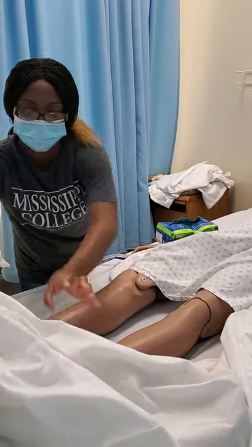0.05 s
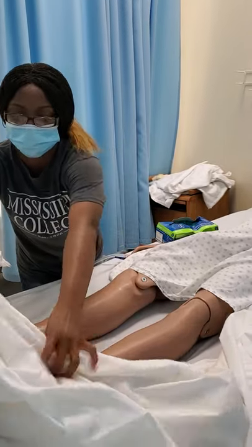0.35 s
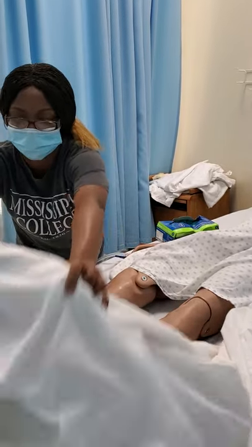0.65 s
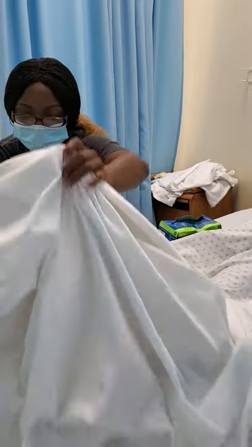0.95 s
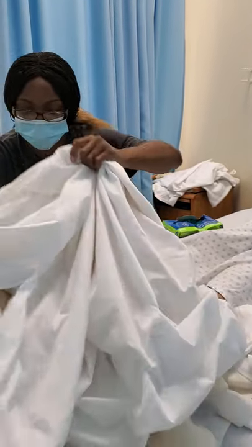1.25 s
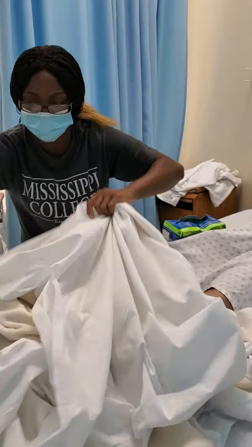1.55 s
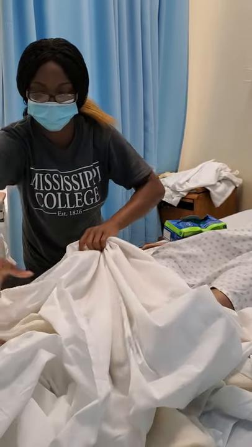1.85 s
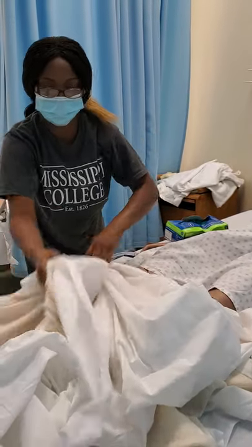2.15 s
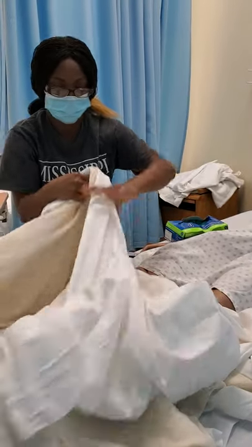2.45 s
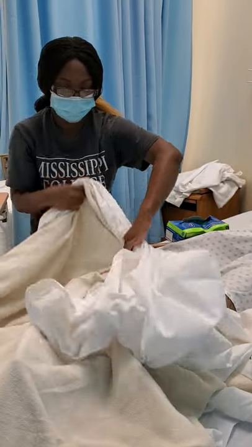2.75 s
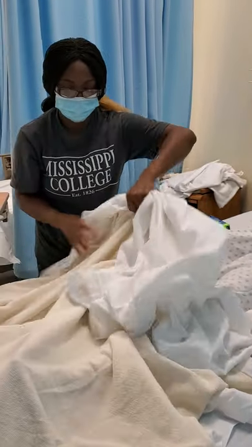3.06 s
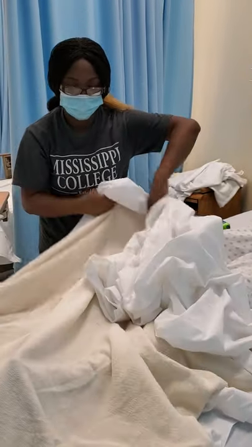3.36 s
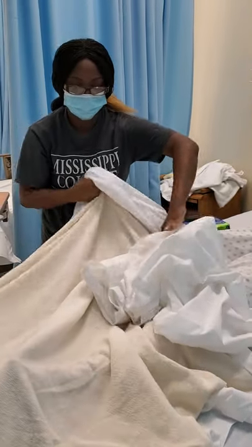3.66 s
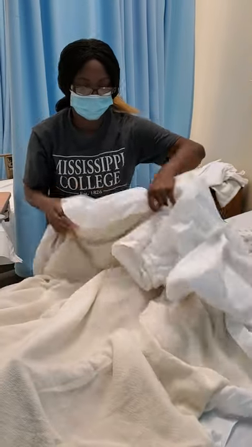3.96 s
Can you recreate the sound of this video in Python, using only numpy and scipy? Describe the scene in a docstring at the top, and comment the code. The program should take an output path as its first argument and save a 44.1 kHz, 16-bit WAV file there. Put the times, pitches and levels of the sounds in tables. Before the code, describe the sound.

Close, soft rustling of bedding in a small room: a sheet is lifted and snaps lightly taut, settles, then swishes and crumples again as it is gathered up. A low ventilation rumble and fan hum continue underneath.

```python
"""A small ventilated room, where a cotton sheet is pulled up off a bed and gathered into a bundle.
Up front the weave hisses as it slides over the blanket, with crumpling folds and short brushes on top.
The cloth flaps and snaps as it goes taut, and the air it pushes adds soft low swells.
Underneath, the ventilation lays down the room tone: duct rumble and a wavering fan hum."""
import sys
import numpy as np
from scipy import signal
from scipy.fft import rfft, irfft
from scipy.io import wavfile

SR = 44100
rng = np.random.default_rng(int(sys.argv[2]) if len(sys.argv) > 2 else 0)


def persist_wave(psi):
    """Save psi, clipped to +-1, as 16-bit WAV."""
    counts = np.round(np.clip(psi, -1, 1) * 32767).astype(np.int16)
    wavfile.write(sys.argv[1], SR, np.atleast_2d(counts).T)


N = 176400

# Hiss fader, riding the speed of the cloth: t/s, relative level/dB, pan/dB (pan is left minus right)
SLIDE_FADER = [(0, -74, 0), (.11, -73, -4), (.19, -77, -1), (.33, -77.5, 0), (.41, -72.5, -2),
               (.47, -74.5, -3), (.555, -77, 0), (.64, -69.5, -2), (.78, -62.5, -2), (.85, -67, -0.5),
               (1.05, -67.5, -1), (1.25, -68.5, -3), (1.52, -74, -1), (1.65, -73.5, -2), (1.8, -75.5, -5.5),
               (1.95, -80.5, -1), (2.05, -73.5, -5), (2.14, -75.5, 2), (2.24, -68, -1), (2.33, -65, 2),
               (2.42, -64.5, -1.5), (2.5, -66, -0.5), (2.64, -63.5, 0.5), (2.72, -71.5, 1),
               (2.79, -75.5, 1), (2.9, -69, 0), (3.04, -68, 1), (3.13, -71, 0), (3.22, -69.5, -0.5),
               (3.32, -74.5, 0), (3.44, -65.5, 2), (3.54, -66, 2), (3.61, -68, 1), (3.7, -64, 0.5),
               (3.81, -73.5, 2), (3.88, -67.5, 0), (4, -71, 0)]
# How hard the folds crumple: t/s, relative level/dB
CRUMPLE_FADER = [(0, -77.5), (.1, -77), (.22, -82), (.35, -77.5), (.5, -73.5), (.63, -78.5), (.69, -74.5),
                 (.8, -71), (.89, -75.5), (1.09, -73.5), (1.16, -76), (1.4, -76.5), (1.6, -80.5),
                 (1.9, -80.5), (2.19, -80.5), (2.33, -73.5), (2.5, -74.5), (2.62, -73.5), (2.79, -78),
                 (2.96, -73), (3.15, -80.5), (3.3, -80), (3.45, -77.5), (3.7, -76.5), (3.8, -79),
                 (3.88, -77.5), (4, -79)]
# EQ of the bright weave and the duller folds: f/Hz, relative level/dB
WEAVE_EQ = [(1500, -9.5), (3500, -13), (5000, -14), (6400, -8), (7400, -13.5), (8500, -1.5), (10500, -3),
            (12000, -1), (14000, 1), (15500, 3)]
FOLD_EQ = [(150, 1), (400, 4.5), (900, 10.5), (1400, 1.5), (1750, 7), (2100, 0.5), (2500, 4), (3100, -2),
           (4100, -1.5), (5200, -17.5), (8000, -31), (15000, -46)]
# Their stereo placement: f/Hz, pan/dB
WEAVE_PAN = [(3000, -5.5), (6000, -3), (7300, -7.5), (8000, 5), (9000, -7.5), (11500, -4.5), (13500, 0.5),
             (15500, 4.5)]
FOLD_PAN = [(700, 4.5), (1500, 12.5), (2300, -6), (3100, 7), (4000, 1), (6000, 15)]
# The cloth flaps or snaps taut: t/s, thump level/dB, crack level/dB, crack f/Hz
FLAP_CUES = [(0.673, -37.5, -50.5, 2780), (0.7239, -41, -72, 1200), (0.777, -46, -60, 1710),
             (1.094, -44.5, -65, 2300), (2.273, -43, -56, 1100), (2.326, -58, -59, 1400),
             (3.3245, -45.5, -54.5, 1000)]
# A hand or fold brushes the cloth: peak t/s, half length/s, centre f/Hz, width/centre, level/dB, pan/dB
BRUSH_CUES = [(0.05, 0.058, 2830, 0.14, -76, 0), (0.093, 0.043, 10500, .25, -83, -6),
              (0.443, 0.072, 14600, .18, -72, 1), (0.708, 0.02, 3150, .07, -68.5, -1),
              (0.785, 0.06, 4970, 0.28, -80, -2), (.96, 0.15, 15100, 0.18, -67, -4),
              (1.082, 0.039, 2400, 0.18, -76.5, -9), (1.223, 0.05, 3000, .2, -78.5, 0),
              (1.34, 0.039, 2950, .11, -74, 2), (1.47, 0.057, 3030, 0.09, -77.5, 2),
              (1.686, 0.077, 3050, 0.093, -79.5, 5), (1.7, 0.09, 9600, 0.13, -88, -4),
              (2.276, 0.044, 1210, .2, -73, 1), (2.328, .028, 13000, 0.16, -66, -1),
              (2.42, 0.079, 4670, .28, -77, 0), (2.976, 0.058, 2800, .17, -84, 2),
              (3.48, 0.066, 8760, .14, -78, 0)]
# The swung sheet pushes air: peak t/s, half length/s, level/dB
BILLOW_CUES = [(0.043, 0.023, -46), (0.14, 0.025, -51), (0.323, 0.069, -47.5), (0.57, 0.12, -47.5),
               (0.765, 0.042, -45.5), (1.19, 0.13, -46.5), (1.392, 0.084, -50), (2.367, 0.03, -47),
               (2.883, 0.044, -43.5), (3.173, 0.048, -48.5), (3.59, 0.053, -47.5), (3.963, 0.018, -40.5)]
# EQ of those swells and of the ventilation noise: f/Hz, relative level/dB
BILLOW_EQ = [(20, -40), (45, -18.5), (60, 1.5), (80, 1.5), (110, -8.5), (200, -25), (600, -47.5),
             (2000, -74)]
VENT_EQ = [(15, -23), (23, -9), (29, -2), (37, -14), (56, 3.5), (76, -4.5), (90, -8), (112, -4),
           (138, -10.5), (165, -5.5), (197, -14), (245, -8.5), (280, -15.5), (310, -10.5), (365, -15),
           (405, -11), (470, -18.5), (550, -19.5), (780, -23), (900, -27), (1050, -25.5), (1350, -32),
           (1650, -36), (2100, -45), (2700, -42), (3100, -39), (3600, -46), (4100, -50), (5000, -54.5),
           (7500, -69.5), (9000, -57.5), (15500, -60)]
# Stereo width of the ventilation: f/Hz, left-right correlation (1 is mono)
VENT_CORRELATION = [(60, 0.93), (140, 0.93), (210, 1), (330, 0.88), (500, 1), (770, -0.36), (1170, -0.29),
                    (1800, 0.16), (2700, 0.35), (5000, -0.19)]
# Its stereo placement: f/Hz, pan/dB
VENT_PAN = [(60, -1), (330, -0.5), (410, -2), (480, -3.5), (570, -6.5), (680, 6), (790, -10), (900, 5),
            (1100, 3.5), (1500, 6.5), (2100, -1), (3000, 0.5), (4100, 11), (6000, -5)]
# Fan and motor tones: f/Hz, level/dB, pan/dB, phase lead of the left/rad
FAN_TONES = [(75.22, -57.5, 0.5, 0.5), (119, -55.5, -0.5, 0), (243, -67.5, -1.5, -1),
             (344.5, -66, -3.5, -1), (398.6, -71.5, 3, -0.5), (479.9, -63.5, -0.5, 1.16),
             (720.6, -78.5, -5.5, 1.3), (943, -73.5, -1, 2.5)]

FIBRES_PER_S, FIBRE_SPREAD_DB, WEAVE_FLUTTER_DB, WEAVE_TRIM_DB = 16000, 2.5, 0.63, 4
SHIFT_DB, SHIFT_S, SHIFT_HZ = 1.0, 0.083, 1090
CREASES_PER_S, CREASE_SPREAD_DB, FOLD_FLUTTER_DB, FOLD_TRIM_DB = 3500, 2.6, 1.6, 6.5
THUMP_S, CRACK_S = 0.00049, 0.00055
RASP_DECAY_S, RASP_DB, RASP_CUTOFF_RATIO = 0.007, -10, 1.1
RING_HZ, RING_WIDTH, RING_T60_S, RING_TRIM_DB = 3120, 0.057, 0.4, -26
BRUSH_GRAINS_PER_S, BRUSH_SPREAD_DB = 4000, 3.5
VENT_DB = -50
WAVER_RAD, WAVER_DB, WAVER_PER_S = 0.42, 1, 4.4
ROOM_T60_S, ROOM_SEND_DB = 0.19, -4.5
HIGH_CUT_HZ = 15750


def sliding():
    """The lead hiss: threads catch and slip by the thousand as cloth drags over cloth."""
    level_db, pan_db = curves(SLIDE_FADER)
    fibres = slips(FIBRES_PER_S, FIBRE_SPREAD_DB)
    hiss = eq(shifting(fibres), WEAVE_EQ, WEAVE_PAN)
    flutter_db = WEAVE_FLUTTER_DB * drift(per_s=39)
    return hiss * pan(pan_db) * amp(WEAVE_TRIM_DB + level_db + flutter_db)


def shifting(x):
    """Slow random patches of tone colour as the cloth changes shape."""
    hz, t, spectra = signal.stft(x, SR, nperseg=512)
    time_blur = np.exp(-((t[:, None] - t) / SHIFT_S) ** 2)
    pitch_blur = np.exp(-((hz[:, None] - hz) / SHIFT_HZ) ** 2)
    patches = unit(pitch_blur @ rng.standard_normal(spectra.shape) @ time_blur)
    return signal.istft(spectra * amp(SHIFT_DB * patches), SR, nperseg=512)[1][:, :N]


def crumpling():
    """The midrange body: folds buckle in clumps of soft, duller crackles."""
    level_db, = curves(CRUMPLE_FADER)
    creases = slips(CREASES_PER_S, CREASE_SPREAD_DB)
    clumps = amp(FOLD_FLUTTER_DB * drift(per_s=16))
    return eq(room(creases * clumps), FOLD_EQ, FOLD_PAN) * amp(FOLD_TRIM_DB + level_db)


def flaps():
    """The accents: cloth pulled tight puffs air and cracks, with a rasp of threads and a faint ring."""
    t, out = np.arange(8192) / SR, np.zeros(N)
    hz = np.fft.rfftfreq(len(t), 1 / SR)
    thump = 2 * np.sin(t / THUMP_S) * np.exp(-t / THUMP_S / 2)
    crack_envelope = (t / CRACK_S * np.exp(1 - t / CRACK_S)) ** 2
    for s, thump_db, crack_db, crack_hz in FLAP_CUES:
        crack = np.sin(2 * np.pi * crack_hz * t) * crack_envelope
        phases = np.exp(2j * np.pi * rng.random(len(hz)))
        ring = unit(irfft(bell(hz, RING_HZ, RING_WIDTH) * phases)) * amp(-60 * t / RING_T60_S)
        ring *= amp(RING_TRIM_DB) * (crack_hz / RING_HZ) ** 2  # higher cracks ring more
        lowpass = 1 / (1 + (hz / (RASP_CUTOFF_RATIO * crack_hz)) ** 4)
        rasp = unit(irfft(rfft(rng.standard_normal(len(t))) * lowpass))
        rasp *= amp(RASP_DB) * np.exp(-t / RASP_DECAY_S)
        add(out, s, amp(thump_db) * thump + amp(crack_db) * (crack + rasp + ring))
    return room(out)


def brushing():
    """A hand or fold grazes the cloth: short grainy swishes, each in its own band."""
    hz, out = np.fft.rfftfreq(N, 1 / SR), np.zeros((2, N))
    for s, half_s, centre_hz, width, db, pan_db in BRUSH_CUES:
        grains = slips(BRUSH_GRAINS_PER_S, BRUSH_SPREAD_DB)
        swish = unit(irfft(rfft(grains) * bell(hz, centre_hz, width), N))
        out += amp(db) * pan(pan_db)[:, None] * swell(s, half_s) * swish
    return out


def billowing():
    """The low-end weight: soft swells of air moved by the sheet."""
    envelope = sum(amp(db) * swell(s, half_s) for s, half_s, db in BILLOW_CUES)
    return envelope * eq(rng.standard_normal(N), BILLOW_EQ)


def ventilation():
    """The room tone: duct rumble and rushing air, nearly mono in the bass."""
    hz = np.fft.rfftfreq(N, 1 / SR)
    left, independent = np.exp(2j * np.pi * rng.random((2, len(hz))))
    correlation = np.clip(read(VENT_CORRELATION, hz), -1, 1)
    right = correlation * left + np.sqrt(1 - correlation ** 2) * independent
    spectrum = np.array([left, right]) * pan(read(VENT_PAN, hz)) * amp(read(VENT_EQ, hz))
    return amp(VENT_DB) * unit(irfft(spectrum, N))


def fan():
    """Fan and motor hum: steady tones that waver a little in phase and level."""
    t, out = np.arange(N) / SR, np.zeros((2, N))
    for hz, db, pan_db, lead in FAN_TONES:
        phase = 2 * np.pi * (hz * t + rng.random()) + WAVER_RAD * drift(WAVER_PER_S)
        tone = np.sin([phase + lead, phase]) * amp(WAVER_DB * drift(WAVER_PER_S))
        out += amp(db) * pan(pan_db)[:, None] * unit(tone)
    return out


def room(x):
    """Dry sound plus a short tail of scattered reflections, different on each side."""
    t = np.arange(SR // 2) / SR
    taps = rng.standard_normal((2, len(t))) * (rng.random((2, len(t))) < .1)
    tail = taps * (t > .003) * amp(-60 * t / ROOM_T60_S)  # 3 ms pre-delay
    tail /= np.linalg.norm(tail, axis=1, keepdims=True)
    return x + amp(ROOM_SEND_DB) * signal.fftconvolve(np.atleast_2d(x), tail, axes=1)[:, :N]


def slips(per_s, spread_db):
    """Stereo grain: tiny random clicks, most weak and a few strong."""
    out = np.zeros((2, N))
    for side in out:
        size = amp(spread_db * np.minimum(rng.exponential(1, N), 4))
        side += size * rng.choice([-1., 1.], N) * (rng.random(N) < per_s / SR)
    return out


def drift(per_s):
    """Slow random modulation, rms 1."""
    hz = np.fft.rfftfreq(N, 1 / SR)
    return unit(irfft(rfft(rng.standard_normal(N)) * (hz > 0) / (1 + (hz / per_s) ** 4), N))


def swell(peak_s, half_s):
    """Smooth fade in and out around a peak."""
    return np.exp(-((np.arange(N) / SR - peak_s) / half_s) ** 2)


def bell(hz, centre_hz, width):
    """Band-pass curve on a log-frequency axis."""
    return np.exp(-.5 * (np.log((hz + 1) / centre_hz) / width) ** 2)


def eq(x, levels, pans=((0, 0), (1, 0))):
    """Shapes a sound with an EQ table and a pan table; rms 1."""
    hz = np.fft.rfftfreq(N, 1 / SR)
    return unit(irfft(rfft(x) * amp(read(levels, hz)) * pan(read(pans, hz)), N))


def read(points, hz):
    """Reads a table on a log-frequency axis."""
    f, value = np.transpose(points)
    return np.interp(np.log(hz + 1), np.log(f + 1), value)


def curves(rows):
    """Each lane of a fader table, at every sample."""
    s, *lanes = np.transpose(rows)
    return [np.interp(np.arange(N) / SR, s, lane) for lane in lanes]


def add(mix, s, sound):
    """Drops a sound in at its cue."""
    part = mix[max(round(s * SR), 0):][:len(sound)]
    part += sound[:len(part)]


def pan(db):
    """Left and right gains for a level difference."""
    return amp(np.array([db, -db]) / 2)


def amp(db):
    """Decibels to gain."""
    return 10 ** (np.asarray(db) / 20)


def unit(x):
    """Scales to rms 1."""
    return x / np.sqrt(np.mean(x ** 2) + 1e-20)


def scene():
    """The mix: steady room tone with the cloth layers on top."""
    return ventilation() + fan() + sliding() + crumpling() + brushing() + billowing() + flaps()


def record(dry):
    """A steep high cut on the master."""
    high_cut = signal.firwin(1023, HIGH_CUT_HZ, window=("kaiser", 9), fs=SR)
    return signal.oaconvolve(dry, high_cut[None], "same")


dry = scene()
out = record(dry)
persist_wave(out)
```